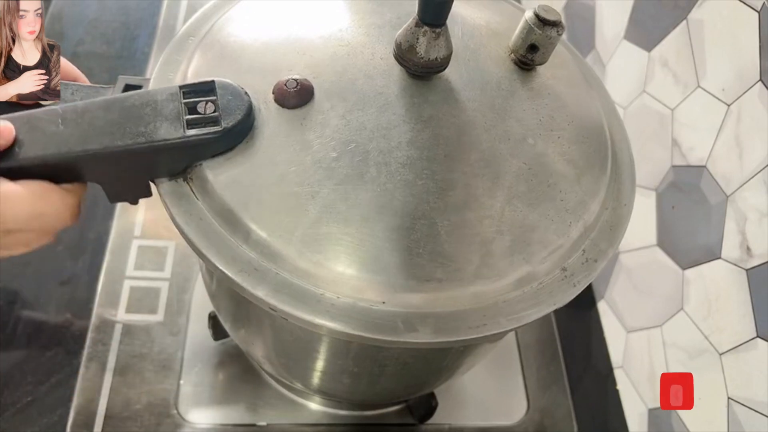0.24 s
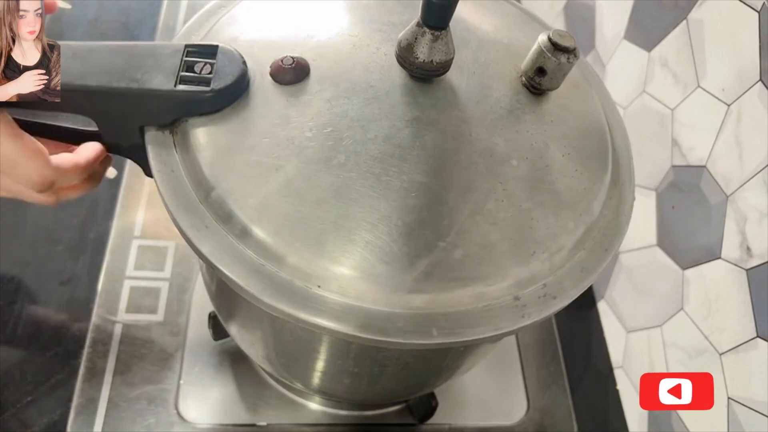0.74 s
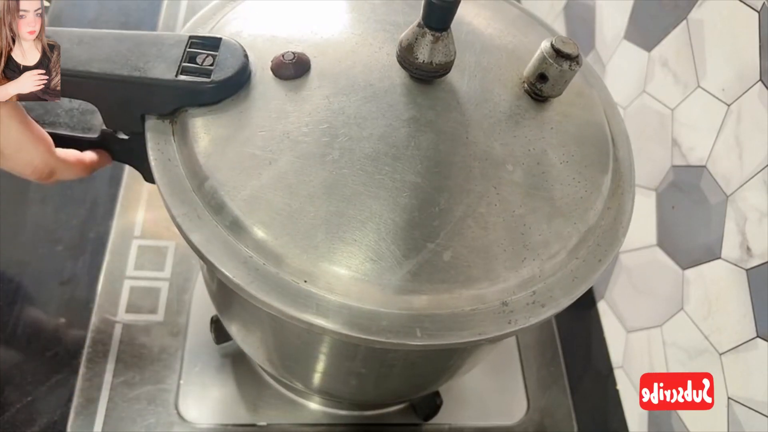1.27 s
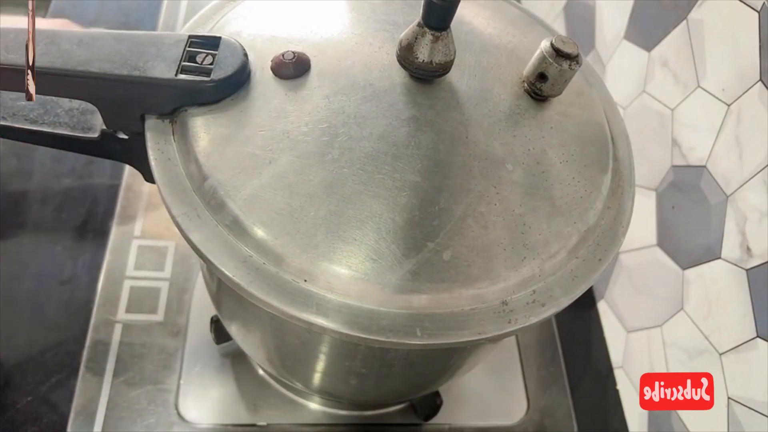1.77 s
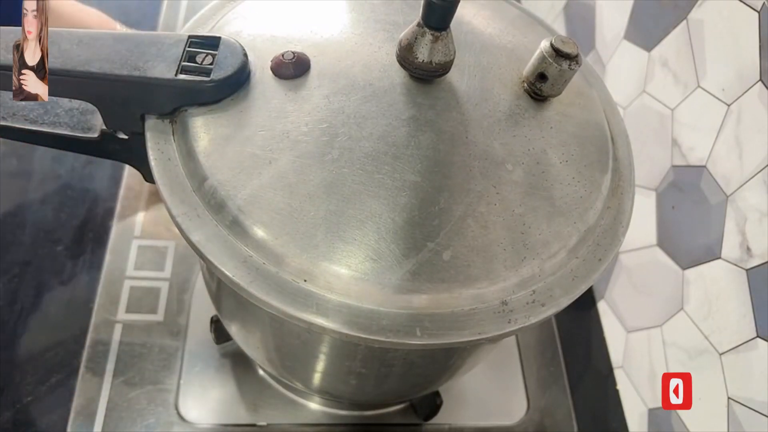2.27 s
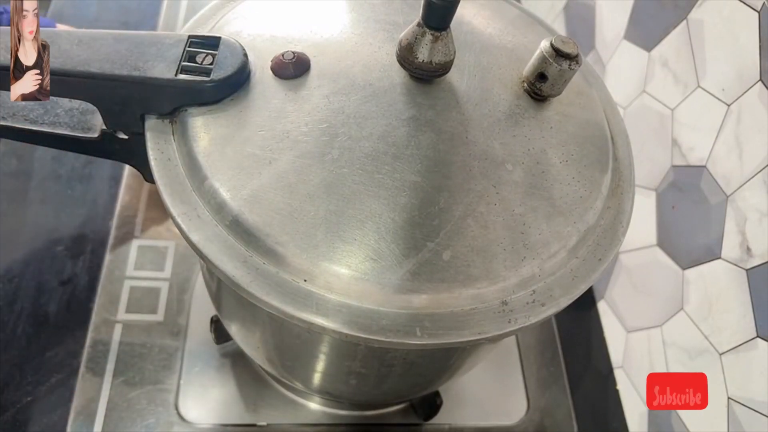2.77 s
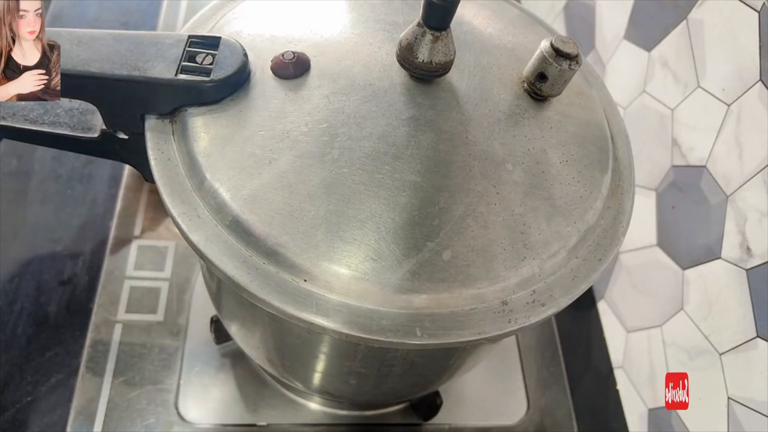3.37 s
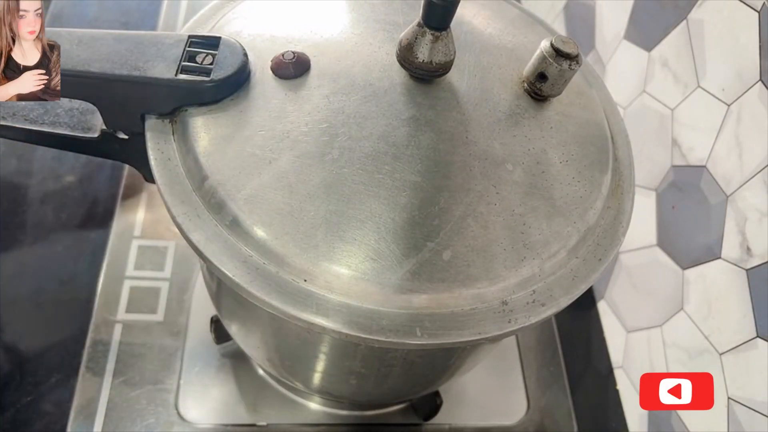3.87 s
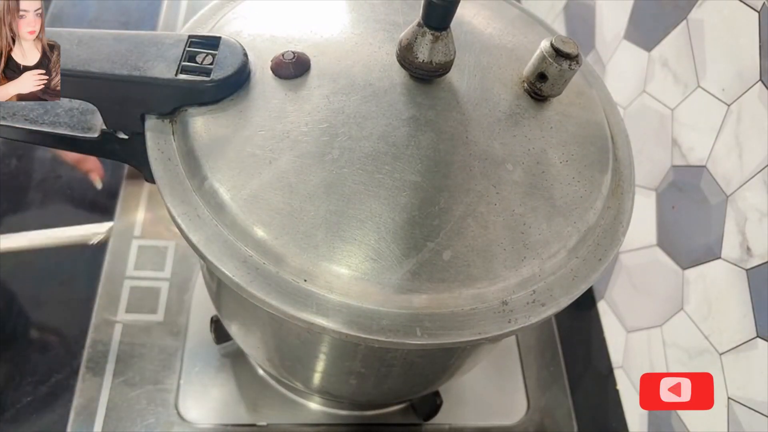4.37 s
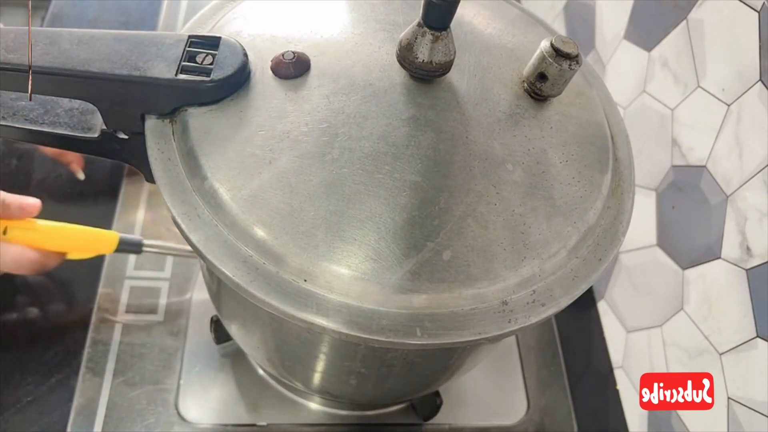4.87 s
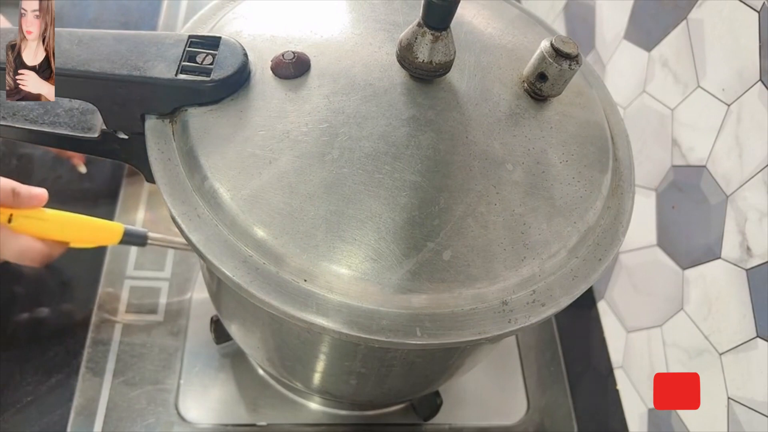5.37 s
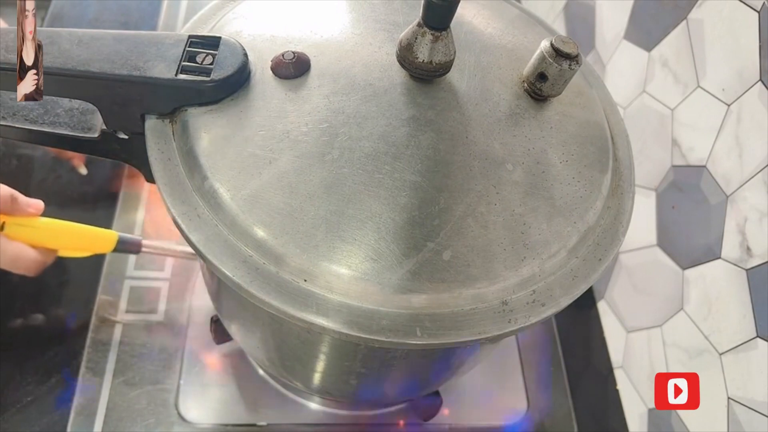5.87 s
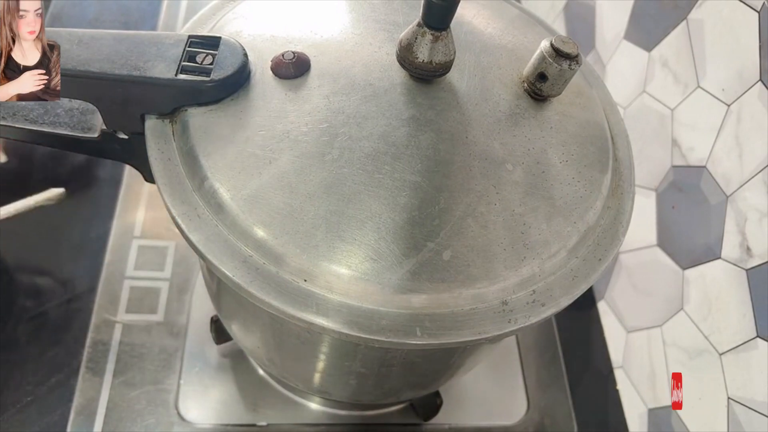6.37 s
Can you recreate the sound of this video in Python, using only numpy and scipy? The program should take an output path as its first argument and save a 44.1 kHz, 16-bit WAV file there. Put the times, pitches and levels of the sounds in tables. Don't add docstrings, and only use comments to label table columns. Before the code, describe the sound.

Close in a hard tiled kitchen, a lid rubs on its gasket and latches with a springy click, handles knocking. Bangles tinkle faintly and a knob clicks. A steel utensil clatters very loudly and rings briefly. After a quiet gap a lighter snaps, then snaps again, and gas ignites with a soft low thump. Faint motor hum and distant engine rumble continue beneath.

```python
import sys
import numpy as np
from scipy import signal
from scipy.fft import rfft, irfft, next_fast_len
from scipy.io import wavfile
from scipy.ndimage import uniform_filter1d, map_coordinates

SR = 44100
rng = np.random.default_rng(int(sys.argv[2]) if len(sys.argv) > 2 else 0)


def transcribe(signal):
    frames = np.atleast_2d(signal).T
    limited = np.clip(frames, -1, 1)
    pcm = np.round(limited * 32767).astype(np.int16)
    wavfile.write(sys.argv[1], SR, pcm)


def boost(x):
    u = np.asarray(x, float) / 20
    return 10 ** u


N = 292671
T_S = np.arange(N) / SR
GAIN_T_S = np.arange(0, N / SR + .002, .001)
SIZE = 2 ** 15


def unit(x):
    return x / np.sqrt(np.mean(x ** 2) + 1e-20)


def along(points, hz):
    f, v = np.transpose(points)
    return np.interp(np.log(hz + 1), np.log(f + 1), v)


def wobble(rate_hz):
    knots = rng.standard_normal(int(N * rate_hz / SR) + 4)
    return map_coordinates(knots, [np.arange(N) * rate_hz / SR])


def filtered(x, response):
    m = next_fast_len(N + SR // 2)
    return irfft(rfft(x, m) * response(np.fft.rfftfreq(m, 1 / SR)), m)[..., :N]


def rush(spectrum, patchy_db):
    z = signal.stft(rng.standard_normal(N), nperseg=512)[2]
    field = uniform_filter1d(rng.standard_normal(z.shape), size=5, axis=0)
    field = uniform_filter1d(field, size=10, axis=1)
    x = signal.istft(z * boost(patchy_db * unit(field)), nperseg=512)[1][:N]
    return unit(filtered(x, lambda hz: boost(along(spectrum, hz))))


def spread(gain):
    return np.interp(T_S, GAIN_T_S, gain)


def swells(rows):
    total = 0
    for s, db, rise_s, hold_s, fall_s in rows:
        before = (s - GAIN_T_S) / rise_s
        after = (GAIN_T_S - s - hold_s) / fall_s
        total = total + boost(db - 20 * np.maximum(np.maximum(before, after), 0))
    return spread(total)


def ducking():
    # t/s, depth/dB
    ducks = [
        (0, 5.5),
        (3.42, 12),
        (5.03, 8),
        (5.751, 5.5),
    ]
    recovery_db_per_s, smoothing_ms = 4.5, 66
    dips = []
    for s, depth_db in ducks:
        recovering = np.minimum(recovery_db_per_s * (GAIN_T_S - s) - depth_db, 0)
        dips.append(np.where(GAIN_T_S >= s, recovering, 0))
    return spread(boost(uniform_filter1d(np.min(dips, axis=0), smoothing_ms, mode="nearest")))


def causal(gain_db):
    c = irfft(np.log(boost(np.maximum(gain_db, -90))))
    c[1:SIZE // 2] *= 2
    c[SIZE // 2 + 1:] = 0
    return rfft(c)


def tiles():
    # f/Hz, t60/s
    decay = [(200, 0.73), (1500, 0.48), (5000, 0.48), (12000, 0.42)]
    hz = np.fft.rfftfreq(256, 1 / SR)
    t = np.arange(SIZE // 128 + 1) * 128 / SR
    z = rng.standard_normal((len(hz), len(t), 2)).view(complex)[..., 0]
    fade = boost(-60 * t / along(decay, hz)[:, None])
    tail = signal.istft(z * fade, SR, nperseg=256)[1][:SIZE]
    tail = tail * (1 - np.exp(-np.arange(SIZE) / SR / 0.0032))
    return tail / np.linalg.norm(tail)


def blows(events, body, room_db, usual_ring, ring_per_db):
    colour, modes = body
    out, t, hz = np.zeros(N + SIZE), np.arange(SIZE) / SR, np.fft.rfftfreq(SIZE, 1 / SR)
    broad = causal(along(colour, hz))
    octaves = causal(np.log2(hz / 2500 + 0.01))
    lifts = causal(sum(db / (1 + (2 * (hz - c) / w) ** 2) for c, w, db in modes))
    usual_db = np.mean(events, axis=0)[2]
    for s, db, treble_db, t60 in events:
        harder_db = treble_db - usual_db
        ring = np.clip(usual_ring + ring_per_db * harder_db, .15, 1)
        push = rng.standard_normal(SIZE) * boost(-60 * t / t60) * (1 - np.exp(-t / (0.087 * t60)))
        first_touch = 0.47 * min(0.011 / t60, 1) * np.linalg.norm(push)
        push[round(.08 * t60 * SR)] += first_touch
        voice = broad + harder_db * .5 * octaves
        direct = irfft(rfft(push) * np.exp(voice + ring * lifts))
        all_round = np.linalg.norm(push) * np.exp(voice + 0.65 * ring * lifts)
        echo = irfft(all_round * rfft(tiles()))
        out[round(s * SR):][:SIZE] += boost(db) * (direct + boost(room_db) * echo) / np.abs(direct).max()
    return out[:N]


def ringing(hits, modes):
    attack_s, scatter_db = 0.0017, 1.5
    out, t = np.zeros(N + SIZE), np.arange(SIZE) / SR
    for s, db in hits:
        tone = 0
        for hz, up_db, t60 in modes:
            level_db = db + up_db + scatter_db * rng.standard_normal()
            tone = tone + boost(level_db - 60 * t / t60) * np.sin(2 * np.pi * hz * t)
        out[round(s * SR):][:SIZE] += (1 - np.exp(-t / attack_s)) * tone
    return out[:N]


def engines():
    # t/s, level/dB
    loudness = [(0.0, -57), (0.28, -53), (0.46, -41.5), (0.49, -47), (1.51, -43.5), (1.58, -62),
                (1.64, -45.5), (2.18, -43), (2.54, -50.5), (2.95, -45.5), (3.46, -45.5), (3.52, -57.5),
                (4.48, -52.5), (4.74, -46), (5.55, -53), (5.98, -50.5), (6.156, -52), (6.637, -48)]
    # f/Hz, density/dB
    rumble = [(40, -38.5), (65, 2.5), (100, 0.5), (140, -2.5), (170, -17.5), (220, -25.5), (400, -75.5)]
    steady_hz = [83, 96.4]
    steady_db = [-13.5, -3]
    loudest_db, rumble_db, wandering_db = -44, -2, -1.5
    wandering_hz = 114.8 + 3.8 * wobble(1.5)
    s, level_db = np.transpose(loudness)
    db = np.minimum(np.interp(T_S, s, level_db), loudest_db)

    def line(hz, up_db):
        level = boost(db + up_db + 1.7 * wobble(8.8) + 1.1 * wobble(2.5))
        return level * np.sin(2 * np.pi * np.cumsum(hz) / SR + 1.7 * wobble(5))

    out = boost(db + rumble_db) * unit(boost(1.4 * wobble(14.0)) * rush(rumble, patchy_db=-3.5))
    out = out + line(wandering_hz, wandering_db)
    for hz, up_db in zip(steady_hz, steady_db):
        out = out + line(np.full(N, hz), up_db)
    return out


def background():
    # f/Hz, density/dB
    traffic = [(12, -53.5), (20, -20.5), (46, 4.5), (80, 4.5), (100, -32), (180, -120)]
    # f/Hz, density/dB
    murmur = [(90, -29.5), (150, 1), (250, 2), (400, -2.5), (560, -6.5), (700, -14.5), (1300, -27),
              (2500, -77.5)]
    # f/Hz, density/dB
    rustle = [(530, -26), (900, -3), (1510, -7), (1660, -10), (1830, -9.5), (3120, -9.5), (5700, -25.5),
              (7000, -25), (9100, -48.5), (15400, -120)]
    # f/Hz, density/dB
    cloth = [(2940, -14), (5000, -7), (6130, -9), (10100, -12), (12500, -14.5), (13500, -14.5)]
    # t/s, level/dB, rise/(s per 20 dB), hold/s, fall/(s per 20 dB)
    lorry = [
        (.45, -64, -3, 0.71, -4),
        (2.1, -52, 1, 1.13, 0.5),
        (5.9, -54.5, 1.8, 0.44, 2),
    ]
    # t/s, level/dB, rise/(s per 20 dB), hold/s, fall/(s per 20 dB)
    shuffle_rows = [
        (.5, -65.5, 0.74, 0, 0.99),
        (1.14, -90, 0.79, 0, 0.37),
        (2.68, -67.5, 0.68, 0, 0.86),
        (1.95, -74, 0.28, 0.043, .3),
        (3.85, -73, 0.29, 0.047, 0.88),
        (5.4, -66, 0.44, 0.028, 0.24),
        (5.8, -59, .2, 0.038, 0.15),
        (6.3, -71, 0.86, 0.15, 0.44),
    ]
    # t/s, level/dB, rise/(s per 20 dB), hold/s, fall/(s per 20 dB)
    sleeve = [
        (.42, -72, 0.84, 0.25, 0.19),
        (1.5, -74, 0.14, 0.0098, .2),
        (1.92, -71, .05, 0.064, .06),
        (3.96, -70, .5, 0.096, 0.12),
        (5.3, -76, 0.73, 0.023, 0.9),
        (6.355, -70, .02, 0.063, 0.032),
    ]
    # t/s, level/dB, rise/(s per 20 dB), hold/s, fall/(s per 20 dB)
    clatter_noise = [
        (3.2, -51.5, 0.23, 0.12, 0.23),
        (3.36, -36, 0.053, 0.019, .22),
    ]
    # t/s, level/dB, rise/(s per 20 dB), hold/s, fall/(s per 20 dB)
    roar = [
        (5.75, -32.5, 0.078, 0.006, 0.051),
    ]
    deep_db, murmur_db, rustle_db, cloth_db, shuffle_low_db = -68, -54, -62, -74.5, 4.5
    steady, shuffle = ducking(), swells(shuffle_rows)
    deep = boost(deep_db + 2.5 * wobble(3.3)) * steady + swells(lorry)
    mid = boost(murmur_db) * steady + boost(shuffle_low_db) * shuffle + swells(roar)
    high = boost(rustle_db) * steady + shuffle + swells(clatter_noise)
    top = boost(cloth_db) * steady + swells(sleeve)
    out = deep * rush(traffic, patchy_db=2.5) + mid * rush(murmur, patchy_db=-0.9)
    return out + high * rush(rustle, patchy_db=0.27) + top * rush(cloth, patchy_db=0.0)


def fan():
    # f/Hz, level/dB rms
    hum = [(199.2, -57.5), (250, -73), (297, -65), (393, -63.5), (495.3, -77), (545.5, -56.5), (556, -60),
           (594, -65), (1087, -75)]
    lines = 0
    for hz, db in hum:
        level = boost(db + 2.0 * wobble(18))
        lines = lines + level * np.sin(2 * np.pi * hz * T_S + 0.27 * wobble(13))
    return boost(3 + 1.2 * wobble(5.7)) * ducking() * lines


def lid():
    # t/s, level/dB, rise/(s per 20 dB), hold/s, fall/(s per 20 dB)
    turn = [
        (.36, -63.5, 0.11, .12, .3),
        (.62, -64.5, 0.14, 0.081, 0.063),
        (.86, -61.5, 0.074, 0.03, .04),
    ]
    # f/Hz, density/dB
    rim = [(1500, -40), (2400, -10), (3100, 0), (4200, -4.5), (6000, -8), (8000, -12), (13500, -30)]
    return swells(turn) * unit(boost(1.4 * wobble(71.0)) * rush(rim, patchy_db=3.5))


def cooker():
    # t/s, peak/dB, treble/dB, contact t60/s
    thuds = [
        (.44, -37, -28.5, .07),
        (1.95, -42.5, -11, 0.44),
        (2.083, -39.5, -2.5, 0.13),
        (2.115, -34, -2, .097),
        (2.168, -48, 0, 0.039),
        (.9, -39.5, -20, .1),
        (1.2, -36, -7.5, 0.059),
        (2.655, -34.5, -3, 0.06),
        (3.3465, -17.5, 8, .05),
        (5.012, -35, -8, 0.058),
    ]
    # (f/Hz, width/Hz, lift/dB)
    thud_body = ([(60, -34), (150, 0), (300, -1.5), (450, -3), (900, -22.5), (2500, -29), (6000, -62)],
                  [(426, 44, 4), (570, 120, 7.2)])
    # t/s, peak/dB, treble/dB, contact t60/s
    latch = [
        (0.8774, -21.5, -33, 0.0227),
    ]
    # (f/Hz, width/Hz, lift/dB)
    latch_body = ([(150, -36), (300, -12), (650, -4.5), (1300, -7), (2200, -2.5), (3200, 0.5), (4500, -6),
                   (6500, -25), (13500, -46)], [(647, 780, 13), (1620, 58, 1), (2190, 150, 17),
                   (2680, 80, 2), (3240, 250, 6.5), (3820, 90, 0)])
    # t/s, peak/dB, treble/dB, contact t60/s
    knocks = [
        (1.032, -35.5, -19.5, .03),
        (1.074, -44, -11.5, 0.027),
        (1.1785, -29, -9.5, 0.034),
        (1.222, -43, -5, 0.04),
        (3.168, -22, -10, 0.025),
    ]
    # (f/Hz, width/Hz, lift/dB)
    knock_body = ([(150, -14), (300, -5), (500, -5), (780, -6.5), (1100, -9.5), (1800, -9), (2600, -27.5),
                   (8000, -57)], [(800, 230, 14), (595, 53, 4.4)])
    # t/s, level/dB
    spring_hits = [
        (.878, -35.5),
    ]
    # f/Hz, level/dB, t60/s
    spring = [(2213, 1, .11), (2670, -12, .3), (3120, -12, .35), (3467, -16, .25), (3770, -14, .21),
              (4670, -10, .03)]
    # t/s, level/dB
    handle_hits = [
        (1.031, -45),
        (1.1787, -31.5),
    ]
    # f/Hz, level/dB, t60/s
    handle = [(778, -3, .07), (829, 0, 0.065), (592, -4, 0.088)]
    # t/s, level/dB
    catch_hits = [
        (2.652, -38.5),
    ]
    # f/Hz, level/dB, t60/s
    catch = [(579, 0, 0.19), (700, -8, .1)]
    out = blows(thuds, thud_body, room_db=-1.7, usual_ring=.55, ring_per_db=.035)
    out = out + blows(latch, latch_body, room_db=-4.5, usual_ring=1.0, ring_per_db=0)
    out = out + blows(knocks, knock_body, room_db=-1.7, usual_ring=0.99, ring_per_db=0.032)
    return out + ringing(spring_hits, spring) + ringing(handle_hits, handle) + ringing(catch_hits, catch)


def bangles():
    # t/s, level/dB, f/Hz, t60/s
    touches = [
        (1.365, -71, 9050, .1),
        (1.676, -64, 9200, 0.078),
        (1.742, -54.5, 8170, .1),
        (1.745, -70, 5700, 0.27),
        (1.745, -62, 12000, .2),
        (1.76, -54, 9100, 0.12),
        (1.8, -67, 9100, 0.33),
        (3.985, -67, 9100, .12),
    ]
    out, t = np.zeros(N + SIZE), np.arange(SIZE) / SR
    for s, db, hz, t60 in touches:
        pair = np.sin(2 * np.pi * hz * t) + 0.33 * np.sin(2 * np.pi * (hz + 45) * t)
        out[round(s * SR):][:SIZE] += boost(db - 60 * t / t60) * pair
    return out[:N]


def knob():
    # t/s, peak/dB, treble/dB, contact t60/s
    clicks = [
        (1.7414, -49, 9, .03),
        (2.4714, -40, 0, .03),
        (2.4866, -38.5, -5, 0.0362),
        (6.6174, -43.5, -1, .03),
    ]
    # (f/Hz, width/Hz, lift/dB)
    knob_body = ([(410, -41), (700, -29), (954, -2), (1240, -17), (1550, -6.5), (2730, -10), (10200, -24),
                  (13500, -25)], [(1140, 61, 15), (10000, 800, 4.6)])
    return blows(clicks, knob_body, room_db=-0.49, usual_ring=1.0, ring_per_db=0)


def gas():
    # t/s, level/dB, rise/(s per 20 dB), hold/s, fall/(s per 20 dB)
    flow = [
        (2.55, -67, 0.24, 5, 1),
    ]
    # f/Hz, density/dB
    jet = [(3000, -91.0), (4800, -27.0), (5450, -10.5), (5650, -4.5), (6150, -4), (6400, -15.5),
           (7500, -23.5), (10800, -23.0), (11400, -20), (12200, -32.0), (14000, -89)]
    lit_s, lit_db = 5.66, -4.5
    softer = boost(np.interp(T_S - lit_s, [0, .3], [0, lit_db]))
    return swells(flow) * ducking() * softer * rush(jet, patchy_db=3.5)


def utensil():
    # t/s, peak/dB, treble/dB, contact t60/s
    rattle = [
        (3.0105, -26.5, -16.5, 0.017),
        (3.1147, -18, -14, .045),
        (3.1675, -15.5, -17.5, .018),
        (3.316, -28.5, -24.5, 0.022),
        (4.37, -52.5, -21.5, 0.043),
        (4.4194, -49.5, -23, 0.03),
    ]
    # (f/Hz, width/Hz, lift/dB)
    rattle_body = ([(350, -47.5), (600, -18), (1470, 0), (1770, 2.5), (2360, 0), (2610, -0.5), (4820, -13),
                    (12000, -18), (13500, -30)], [(1794, 45, 7.2), (2550, 340, 4.5), (3530, 180, 6.1),
                    (5200, 150, 10)])
    # t/s, peak/dB, treble/dB, contact t60/s
    clank = [
        (3.3443, -0.5, -6, .011),
        (3.3475, -6.5, -14, .007),
        (3.367, -15.5, -14, 0.025),
        (3.378, -10, -7.5, 0.011),
        (3.383, -10.5, -17, 0.027),
        (3.39, -12, -13, 0.012),
        (3.396, -11, -17, 0.013),
        (3.411, -12, -21, 0.027),
        (3.432, -14.5, -13, 0.023),
        (3.441, -17.5, -15.5, 0.022),
    ]
    # (f/Hz, width/Hz, lift/dB)
    clank_body = ([(88, -49.5), (150, -39), (350, -14.5), (530, -15.5), (729, -9.5), (949, -10), (1460, -1),
                   (1870, -17), (2430, -7), (8270, -31), (10200, -38), (13500, -41.5)], [(760, 210, 6.7),
                   (1145, 15, 10), (1420, 18, 7), (1390, 18, 4.6), (1680, 17, 6.3), (1580, 18, 6.6),
                   (1776, 17, 10), (2331, 120, 8), (2420, 56, 7), (2920, 15, 7.9), (3380, 30, 8.2),
                   (3800, 31, 7.2), (4070, 60, 8), (10190, 330, 13)])
    # t/s, peak/dB, treble/dB, contact t60/s
    ticks = [
        (3.2995, -22.5, 1.5, .015),
        (3.3125, -19, -7, 0.027),
        (3.3553, -1, -3, 0.003),
        (3.3772, -11.5, -8, .007),
        (3.388, -10.5, -7.5, 0.0059),
        (3.4236, -7, -7.5, 0.0075),
        (3.049, -38, -5, .018),
        (3.070, -28, -0.5, .016),
    ]
    # (f/Hz, width/Hz, lift/dB)
    tick_body = ([(500, -44.5), (1500, -21), (2400, -6.5), (3300, -4.5), (4300, -7), (6000, -12),
                  (8500, -28.5), (13500, -31.5)], [(3350, 320, 3.4), (4000, 170, 5.8), (5204, 200, 5),
                  (10200, 500, 6)])
    # t/s, level/dB
    leg_hits = [
        (3.0105, -36),
        (3.1147, -33),
    ]
    # f/Hz, level/dB, t60/s
    leg = [(1810, -0.5, .15), (2540, -4, .12), (3100, -6, 0.06)]
    # t/s, level/dB
    base_hits = [
        (3.168, -28),
        (3.184, -28.5),
    ]
    # f/Hz, level/dB, t60/s
    base = [(719, 0.5, 0.16), (1766, -6, .15), (1900, -5.5, 0.14), (3050, -9.5, 0.092), (5300, -14, .066)]
    # t/s, level/dB
    heel_hits = [
        (3.3132, -34.5),
        (3.3465, -17),
    ]
    # f/Hz, level/dB, t60/s
    heel = [(403, -2, .07), (520, 0, 0.051), (640, -3, .07), (1004, -2.5, .05), (4050, -3, 0.055)]
    # t/s, level/dB
    pan_hits = [
        (3.3455, -29.5),
        (3.3775, -24.5),
        (3.385, -30),
        (3.396, -30),
        (3.409, -29),
    ]
    # f/Hz, level/dB, t60/s
    pan = [(746, -7, 0.39), (996, -12, .35), (1154, -0.5, .4), (1224, -6, .35), (1290, -5, 0.45),
           (1330, -3, .4), (1422, -4.5, .35), (1470, -2.5, .4), (1499, -4.5, .4), (1780, -12, .35),
           (2380, -8, .35), (2972, -9, .25), (3710, -9.5, .3), (4075, -10.5, .3)]
    tail_duck = 0.14
    clatter = blows(clank, clank_body, room_db=-1.3, usual_ring=0.93, ring_per_db=-.06)
    out = clatter * ducking() ** tail_duck
    out = out + blows(rattle, rattle_body, room_db=-2.3, usual_ring=0.99, ring_per_db=-.07)
    out = out + blows(ticks, tick_body, room_db=-4, usual_ring=.9, ring_per_db=0)
    out = out + ringing(leg_hits, leg) + ringing(base_hits, base)
    return out + ringing(heel_hits, heel) + ringing(pan_hits, pan)


def grate():
    # t/s, peak/dB, treble/dB, contact t60/s
    nudges = [
        (4.7513, -30.5, -8, 0.069),
        (4.7643, -34.5, -17.5, 0.029),
        (4.7765, -32, -18.5, 0.038),
        (5.243, -38, -15, 0.031),
    ]
    # (f/Hz, width/Hz, lift/dB)
    grate_body = ([(88, -17.5), (150, -5.5), (560, -6.5), (651, -14), (772, -5.5), (5170, -17), (8920, -27),
                   (9990, -26), (12500, -39.5), (13500, -42.5)], [(267, 53, 17), (2930, 920, 2.3),
                   (5070, 201, 5.5)])
    return blows(nudges, grate_body, room_db=-.8, usual_ring=1.0, ring_per_db=0)


def lighter():
    # t/s, peak/dB, treble/dB, contact t60/s
    snaps = [
        (5.0064, -8, -8, 0.01599),
        (5.5871, -7.5, -7.5, 0.0193),
    ]
    # (f/Hz, width/Hz, lift/dB)
    lighter_body = ([(200, -44), (350, -30), (700, -14), (1100, -6.5), (1600, 1), (3400, -8.5),
                     (4100, -10.5), (5400, -0.5), (8300, -6.5), (10300, -9.5), (13500, -7.5)],
                     [(1470, 240, 1.5), (2385, 440, 13), (3430, 640, 14.1), (5320, 99, 11),
                     (10220, 1070, 20.6)])
    return blows(snaps, lighter_body, room_db=0.99, usual_ring=0.93, ring_per_db=0)


def boom():
    # t/s, peak/dB, rise/(s per 20 dB), hold/s, fall/(s per 20 dB), f/Hz
    air = [
        (5.725, -17.5, .07, 0.021, 0.07, 64.6),
        (5.71, -15.5, 0.061, .018, .05, 140),
        (5.79, -27.5, 0.034, 0.018, 0.18, 138),
        (5.665, -27.5, 0.044, 0.018, 0.02, 205),
        (5.69, -24.5, .04, .03, 0.08, 285),
        (5.67, -27, .03, 0.032, 0.09, 410),
        (5.67, -29.5, 0.0186, .035, 0.0556, 560),
        (5.65, -41, .015, .02, 0.1, 930),
    ]
    out = 0
    for *swell, hz in air:
        out = out + swells([swell]) * np.sin(2 * np.pi * hz * T_S + 0.74 * wobble(30))
    return out


def flame():
    # t/s, level/dB, rise/(s per 20 dB), hold/s, fall/(s per 20 dB)
    ignition = [
        (5.68, -26, 0.055, 0.036, 0.047),
        (5.76, -30, 0.054, 0.011, 0.2),
    ]
    # t/s, level/dB, rise/(s per 20 dB), hold/s, fall/(s per 20 dB)
    flutter_rows = [
        (5.67, -25.5, 0.036, 0.045, 0.091),
        (5.76, -47.5, 0.057, 0.0045, 0.27),
    ]
    # f/Hz, density/dB
    thump = [(13, -26.5), (22, -47), (54, 0), (71, -3), (97, -4), (135, 2), (200, -18.5), (220, -27.5),
             (290, -12.5), (480, -120)]
    # f/Hz, density/dB
    flutter = [(120, -27), (200, 3.5), (330, 1.5), (420, -2), (490, -15.5), (560, -1.5), (660, -13.5),
               (930, -13), (1200, -22), (2500, -42)]

    def levelled(x):
        return x / np.sqrt(np.abs(uniform_filter1d(x * x, size=1800)) + 1e-3)

    low = rush(thump, patchy_db=2.5)
    top = rush(flutter, patchy_db=-2.0) * boost(0.92 * wobble(60))
    return swells(ignition) * levelled(low) + swells(flutter_rows) * levelled(top)


def scene():
    room = engines() + background() + fan()
    hands = lid() + cooker() + bangles() + utensil()
    stove = knob() + gas() + grate() + lighter() + boom() + flame()
    return (room + hands + stove)[None]


def low_pass(x):
    return signal.sosfilt(signal.butter(12, 14320, fs=SR, output="sos"), x)


def record(dry):
    low_hz, top_hz, ceiling = 30, 13150, .8
    x = dry / (1 + np.abs(dry / ceiling) ** 4) ** .25
    x = filtered(x, lambda hz: 1 / (1 + (hz / top_hz) ** 300) / (1 + (low_hz / (hz + 1)) ** 4))
    return low_pass(x)


dry = scene()
out = record(dry)
transcribe(out)
```